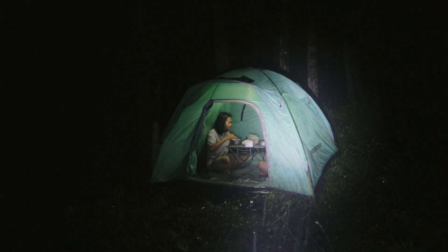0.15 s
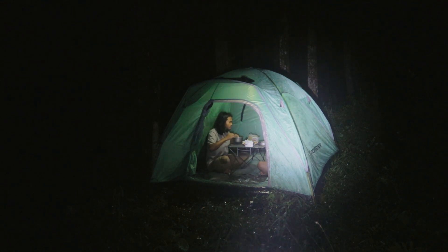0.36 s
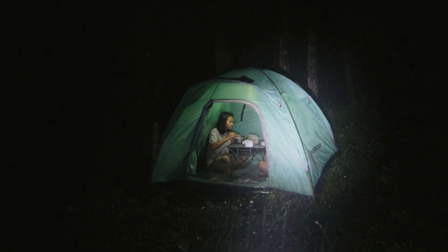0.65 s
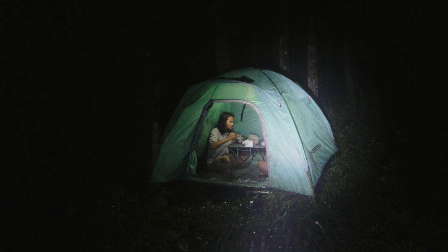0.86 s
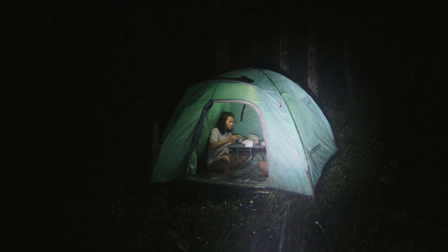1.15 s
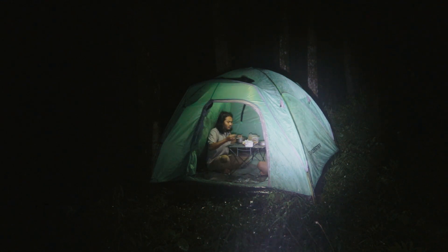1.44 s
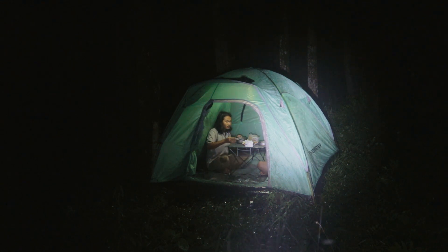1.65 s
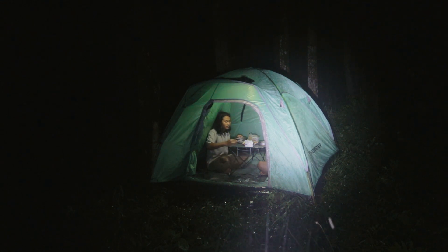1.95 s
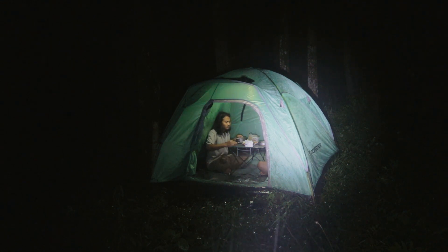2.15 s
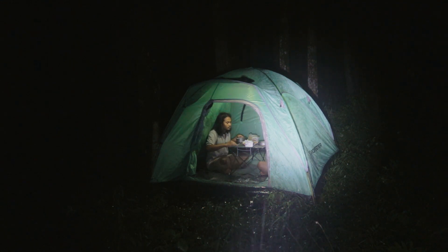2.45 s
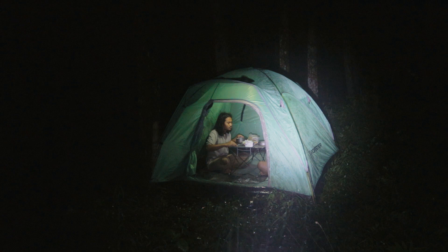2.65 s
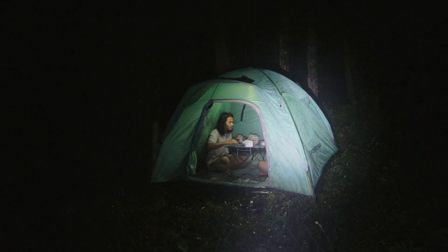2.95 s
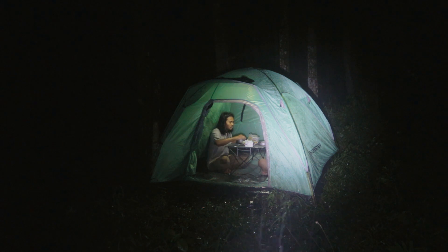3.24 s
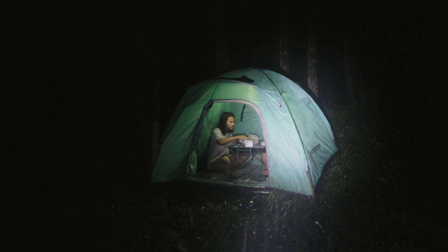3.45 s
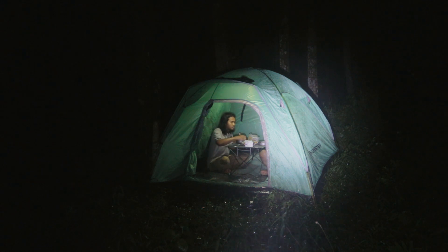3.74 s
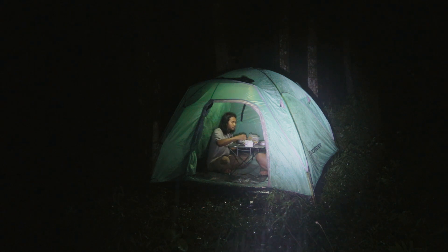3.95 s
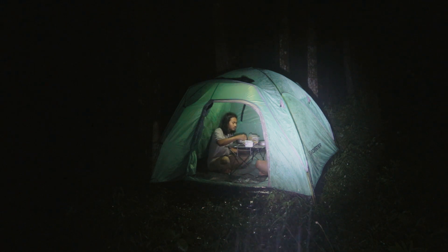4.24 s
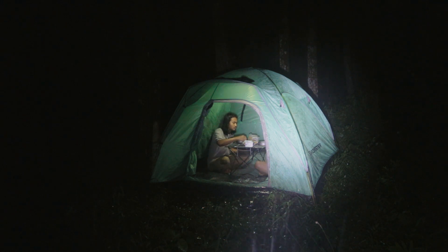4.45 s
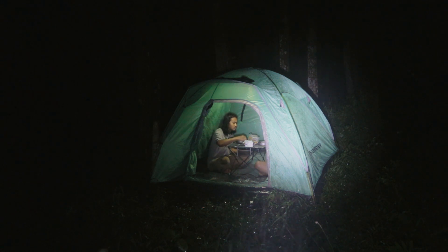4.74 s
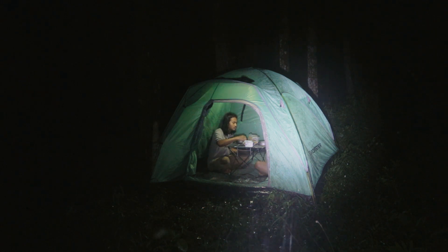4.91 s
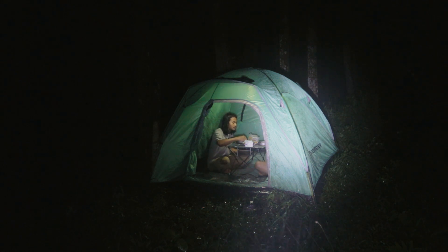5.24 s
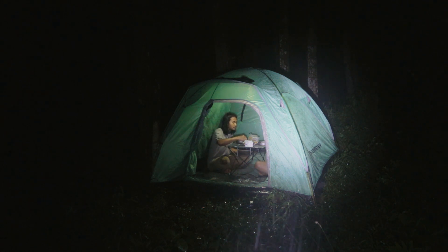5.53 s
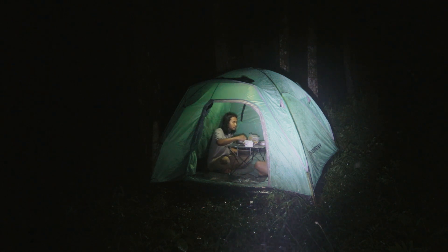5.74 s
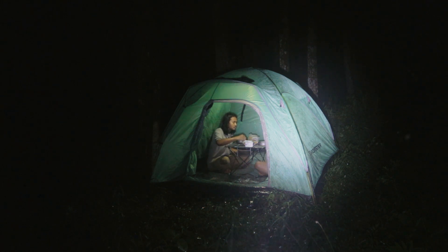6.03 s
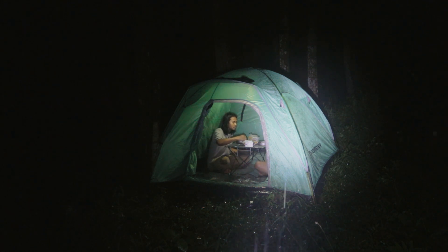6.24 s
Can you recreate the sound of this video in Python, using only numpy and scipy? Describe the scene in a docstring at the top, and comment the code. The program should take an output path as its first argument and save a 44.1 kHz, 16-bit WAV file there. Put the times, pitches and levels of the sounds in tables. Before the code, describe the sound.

Light rain on a tent in a night forest, heard close to the fabric in stereo. Irregular drops hit the taut sheet, each a crisp snap followed by a short sinking thump. Loud hits stand out among many faint ticks, with soft flaps of slack cloth. Behind lie a very quiet rain hiss, leaf patter and a faint steady cricket.

```python
"""Light rain on a tent

Heard from close by the fabric, in a forest at night. A drop excites the taut sheet twice: a sharp snap
of broadband noise through resonances, and a low bending wave that swells later and sinks in pitch.
The further the sheet gives, the stronger its thump and the longer its spatter. Fine drops tick, the slack
sheet flaps, stiff spots ring. Behind them rain hisses in the trees (filtered noise), leaves patter
(random ticks through resonances) and a cricket chirps (a pulsed tone)."""
import sys
import numpy as np
from scipy import signal
from scipy.fft import rfft, irfft, next_fast_len
from scipy.io import wavfile

SR = 44100
rng = np.random.default_rng(int(sys.argv[2]) if len(sys.argv) > 2 else 0)


def digitize_waveform(pressure):
    """Quantize a signal to 16-bit integers and store it at the path in sys.argv[1].

    Rows of a 2-D input are taken as channels; values are limited to [-1, 1].
    """
    field = np.atleast_2d(pressure).T
    bounded = np.clip(field, -1, 1)
    quanta = np.round(bounded * 32767).astype(np.int16)
    wavfile.write(sys.argv[1], SR, quanta)


N = 280917

# voices of an impact: low edge f/Hz, high edge f/Hz, width/centre, trim/dB, ring/spatter length,
# first strike/ripples, tail level/dB, left-right correlation
KNOCK_VOICE = (240.5, 1108, 0.89, 3.5, 3, 1.17, -20, 0.56)
SNAP_VOICE = (887, 4485, 0.7, 1.75, 1.64, 0.68, -28, 0.72)
SPLASH_VOICE = (3999, 12995, 0.86, -4, 1.2, 0.07, -61, 0.84)
SPLASH_HZ = 5280

AGE = np.arange(SR // 6) / SR   # s since an impact
LEVEL_SPAN = SR // 50           # samples: a 0 dB impact has the energy of rms 1 over this span
SHEET_HZ, ARRIVAL_MS = 170, 4.4  # a spot of usual tension: nominal pitch, nominal rise of the thump


def from_db(db):
    """Level: 20 dB is a factor of ten in amplitude."""
    return 10 ** (np.asarray(db) / 20)


def rms_one(x):
    """Normalization: scale to rms 1."""
    return x / np.sqrt(np.mean(x ** 2) + 1e-20)


def unit_hit(x):
    """Energy normalization: scale a short sound to the energy of a 0 dB impact."""
    return rms_one(x) * np.sqrt(LEVEL_SPAN / x.shape[-1])


def at_hz(points, hz):
    """Interpolation of a spectrum on a log-frequency axis."""
    points = np.array(points)
    return np.interp(np.log(hz), np.log(points[:, 0]), points[:, 1])


def band(x, low_hz, high_hz, order=2):
    """Band limitation: a causal Butterworth band-pass."""
    edges = [low_hz, min(high_hz, .48 * SR)]
    sos = signal.butter(order, edges, "band", fs=SR, output="sos")
    return signal.sosfilt(sos, x + 1e-18)


def resonate(x, hz, width_hz):
    """Damped resonance: a pole pair whose radius sets the bandwidth, with a peak gain near 1."""
    r = np.exp(-np.pi * width_hz / SR)
    numerator = np.array([1, 0, -1]) * (1 - r * r) / 2
    denominator = [1, -2 * r * np.cos(2 * np.pi * hz / SR), r * r]
    return signal.lfilter(numerator, denominator, x + 1e-18)


def drift(rate):
    """Slow random modulation: straight lines between normal random knots, rate knots per second."""
    knots = rng.standard_normal(size=512)
    return np.interp(np.arange(N) / SR * rate, np.arange(len(knots)), knots)


def stereo_noise(alike, size):
    """Partial coherence: mid and side noise mixed to a given left-right correlation."""
    mid, side = rng.standard_normal((2, size))
    alike = np.clip(alike, -1, 1)
    opposed = side * [[1], [-1]]
    return (np.sqrt(1 + alike) * mid + np.sqrt(1 - alike) * opposed) / np.sqrt(2)


def turn_phase(x, channel):
    """Interaural phase: one channel lags, little in the bass and by nearly half a turn in the treble."""
    # lag of the channel: f/Hz, phase/rad
    phase_lag = [(120, 0.022), (250, 1.67), (500, 1.88), (1000, 2.06), (2500, 2.66), (6000, 3.02)]
    size = next_fast_len(x.shape[1] + LEVEL_SPAN)
    hz = np.maximum(np.arange(size // 2 + 1) * SR / size, 1)
    turned = rfft(x[channel], size) * np.exp(-1j * at_hz(phase_lag, hz))
    out = x.copy()
    out[channel] = irfft(turned, size)[:x.shape[1]]
    return out


def add(out, sound, s, pan_db=0):
    """Equal-power panning: mix in at a time; positive is left, and the louder channel lags (right if even)."""
    i = int(np.clip(round(s * SR), 0, N - 1))
    gains = rms_one(from_db([[pan_db / 2], [-pan_db / 2]]))
    placed = gains * turn_phase(sound, channel=int(pan_db <= 0))
    out[:, i:i + sound.shape[1]] += placed[:, :N - i]


def forest(patchy_db=1.0, level_db=-56):
    """Filtered noise: far rain in the trees as half-octave bands that flicker a little."""
    # spectrum of the hiss: f/Hz, relative density/dB per Hz
    hiss = [(22, -7), (45, 2), (80, -2.5), (150, -5), (270, -10.5), (600, -11), (1400, -12.5),
            (2800, -16.5), (4300, -21), (6300, -24), (9000, -28.5), (11500, -53), (14500, -77)]
    # left-right correlation of the hiss: f/Hz, correlation (-1..1)
    likeness = [(50, 0.94), (130, 0.94), (400, 0.011), (1500, 0.0051), (3500, 0.042), (7000, 0.84),
                (15000, 0.72)]
    out, edges = 0, 30 * 2 ** (np.arange(19) / 2)
    for low, high in zip(edges, edges[1:]):
        hz = np.sqrt(low * high)
        noise = band(stereo_noise(at_hz(likeness, hz), N), low, high, order=3)
        out = out + from_db(at_hz(hiss, hz) + patchy_db * drift(25)) * noise
    return from_db(level_db) * rms_one(out)


def leaf_patter(level_db=-64.5, per_s=900, spread_db=7.5, width=0.21, count=8):
    """Random impulses through resonances: tiny drops on the leaves tick at one of eight pitches."""
    out = np.zeros((2, N))
    for hz in np.geomspace(900, 6500, count):
        at = np.flatnonzero(rng.random(N) < per_s / count / SR)
        size_db = spread_db * np.minimum(rng.exponential(1, size=2048), 3.5)
        sizes = from_db(size_db) * stereo_noise(0.021, size=2048)
        ticks = np.zeros((2, N))
        ticks[:, at] = sizes[:, at % sizes.shape[1]]
        out += resonate(ticks, hz, width * hz) / hz
    return from_db(level_db) * rms_one(band(out, 540, 6400))


def crickets(hz=5120, level_db=-64, blur_db=-11, waver_db=-0.5, stroke_s=0.017, last_stroke_db=-7,
             echo_db=-15, chorus_hz=4270, chorus_width_hz=620, chorus_db=-69):
    """Amplitude modulation: two firm wing strokes and a weak one pulse a tone; far crickets merge into a band."""
    # some chirp begins at offset_s; chirps repeat about four times a second on both sides of it
    offset_s, period_s, stroke_gap_s = .237, .2553, .049
    age = (np.arange(N) / SR - offset_s + stroke_gap_s) % period_s - stroke_gap_s
    chirp = 0
    for k, db in enumerate((0, 0, last_stroke_db)):
        chirp = chirp + from_db(db) * np.exp(-((age - k * stroke_gap_s) / stroke_s) ** 2)
    phase = 2 * np.pi * np.cumsum(hz + 12 * drift(34)) / SR
    tone = np.sqrt(2) * np.sin(phase) * from_db([[-2.5], [2.5]])   # stronger on the right
    # narrow noise at the same pitch: the chirp blurred by the trees
    blur = rms_one(band(stereo_noise(0, N), hz - 35, hz + 35))
    near = chirp * (tone + from_db(blur_db) * blur) + from_db(echo_db) * blur
    half_width = chorus_width_hz / 2
    chorus = rms_one(band(stereo_noise(0.18, N), chorus_hz - half_width, chorus_hz + half_width))
    return from_db(level_db + waver_db * drift(6.6)) * near + from_db(chorus_db) * chorus


def evened(x, evenness=0.63, keep_s=0.013):
    """Spectral whitening: a slap fills the spectrum evenly, so level the peaks and holes of a short burst."""
    spectrum = rfft(x, 2 * len(AGE))
    power = np.mean(np.abs(spectrum) ** 2, axis=0) + 1e-9
    level = power ** (np.clip(evenness, 0, 1) / 2)
    return unit_hit(irfft(spectrum / level)[:, :len(AGE)] * np.exp(-(AGE / keep_s) ** 2))


def impact(voice, centre_hz, spatter_ms, tail_s=.014):
    """Impulsive excitation of a broad resonance: a strike, decaying ripples and a crackle of thrown droplets."""
    low_hz, high_hz, width, trim_db, ring, strike, tail_db, alike = voice
    ripple_s = ring * spatter_ms / 1000
    ripples = unit_hit(stereo_noise(alike, len(AGE)) * np.exp(-AGE / ripple_s))
    droplets = rng.random(len(AGE)) < 900 / SR   # 900 a second on average
    tail = unit_hit(stereo_noise(alike, len(AGE)) * droplets * np.exp(-AGE / tail_s))
    first_strike = unit_hit(1. * (AGE == 0))
    push = evened(ripples - strike * first_strike) + from_db(tail_db) * tail
    ringing = resonate(push, centre_hz, width * centre_hz)
    return from_db(trim_db) * unit_hit(band(ringing, low_hz, high_hz, order=3))


def thump(hz, arrival_ms, cycles=0.55, sag=0.22, overtone=2.12, overtone_db=-9,
          rustle_db=-14, rustle_s=0.021):
    """Bending wave: it swells after the snap, dies fast and sinks in pitch; its upper partial dies sooner."""
    rise = np.clip(arrival_ms, 2, 4.6) / 1000
    growth = 1 - np.exp(-(AGE / rise) ** 2 * 2)
    swell = growth * np.exp(-np.maximum(AGE - rise, 0) * hz / cycles)
    sinking_hz = hz * (1 - sag + 2 * sag * np.exp(-AGE / rise * 1.5))
    phase = 2 * np.pi * np.cumsum(sinking_hz) / SR
    swing = unit_hit(swell * np.sin(phase))
    upper = unit_hit(swell * np.exp(-AGE * hz) * np.sin(overtone * phase))
    folds = unit_hit(band(stereo_noise(0.69, len(AGE)) * np.exp(-AGE / rustle_s), 100, 290))
    return unit_hit(swing + from_db(overtone_db) * upper + from_db(rustle_db) * folds)


def rattle(low_hz=190, high_hz=430, decay_s=0.0078, alike=0.52):
    """Damped band noise: the fabric shudders briefly, in pitch between the thump and the knock."""
    burst = evened(stereo_noise(alike, len(AGE)) * np.exp(-AGE / decay_s), keep_s=0.054)
    return unit_hit(band(burst, low_hz, high_hz))


def flutter(low_hz=170, high_hz=600, folds_per_s=300, alike=0.52, decay_s=.027):
    """Random impulses under a decay: the folds of the sheet go on flicking raggedly."""
    flicks = rng.random(len(AGE)) < folds_per_s / SR
    burst = stereo_noise(alike, len(AGE)) * flicks * np.exp(-AGE / decay_s)
    return unit_hit(band(burst, low_hz, high_hz))


def drops(thump_trim_db=-4.5, splash_trim_db=2.0, rattle_db=-7.0, rattle_per_give=0.54,
          rattle_per_octave_db=6):
    """Membrane response: each spot answers with its own mix of thump, rattle, knock, snap and splash."""
    # drops from the branches: t/s, level before the voice trims/dB, give = thump over level before trim/dB,
    # nominal sheet f/Hz, knock over level before trim/dB, knock f/Hz, snap f/Hz,
    # wetness = splash over level before trims/dB, left over right/dB
    drop_list = [(0.0146, -28.5, 8, 170, 2.5, 387, 1020, -12.5, 3.5),
                 (0.089, -48, 8, 153, 1, 530, 1060, -6.5, -2.5),
                 (0.121, -69, -10, 170, -8, 440, 2400, -1, -0.5),
                 (0.183, -59.5, -16, 170.0, -12, 440.0, 1950.0, -2, -8),
                 (0.356, -59.5, -12, 170.0, 2, 440.0, 1270, -10.0, -10),
                 (0.373, -63, -4.0, 170.0, 0, 440.0, 1580, -4, 2),
                 (0.402, -44.5, -20, 161, 0, 304, 1520, -7, -1.5),
                 (0.4105, -45, 15.5, 186, 2, 483, 1180, -6, 4),
                 (0.51, -59, -1, 170.0, -4, 440.0, 1740.0, -4, 0),
                 (0.588, -58, -19, 170.0, -22, 440.0, 2110, -2, -20),
                 (0.695, -62, -14, 170, -6, 440, 1500, -11, -0.5),
                 (0.7243, -60.5, -18, 150.0, -6, 759.0, 2210.0, 6.5, -9),
                 (0.803, -57, -17, 170.0, -24, 440.0, 2860, -8, -9),
                 (0.918, -67, -2, 170.0, 9, 440.0, 1560.0, -17, -4),
                 (0.958, -54, 15, 170, -1, 442.0, 1470.0, -3, 0.5),
                 (0.974, -32.5, 2.5, 196, 0, 310, 1200, -15, 4),
                 (1.0144, -55, 2, 128.0, -5.0, 546.0, 2280.0, 3.5, -1),
                 (1.037, -61, 0, 170, -5, 440, 2400, 3, 0),
                 (1.056, -58.5, -11, 170.0, -6, 440.0, 1660, -7, -13),
                 (1.105, -56.5, 17, 114, 5, 439.0, 1390.0, -3, -3),
                 (1.133, -31, -16, 160, -9.5, 540, 1000, -16, -4.5),
                 (1.202, -61, -8, 170, -6, 440, 1900, 2, 0),
                 (1.229, -61, 0, 170.0, -5.0, 440.0, 2310.0, -1, 3),
                 (1.272, -50.5, 13.5, 168, 2.5, 426.0, 1270.0, -4, -5),
                 (1.303, -38.5, -1, 202.0, 2, 326.0, 1750, -8, 1),
                 (1.311, -36, 8, 152, -8, 372, 1740, -12, 3.5),
                 (1.36, -60.5, -11, 170.0, -19, 440.0, 2320.0, -2, 3),
                 (1.471, -41.5, -9, 192, -5, 313, 1400, -6, -6.5),
                 (1.598, -46.5, -2.5, 143, -15, 466.0, 1380, -11.5, 0),
                 (1.625, -54.5, -5, 170, -15, 440, 1400, -19, -1),
                 (1.77, -63, -8, 170, -6, 440, 1900, -7, -3), (1.809, -59, 1, 170.0, 1, 437, 1450, -6, -9),
                 (1.8301, -58.5, 8, 140, 2, 580.0, 2100.0, 6.5, -0.5),
                 (1.897, -56, -6, 170.0, -1.5, 440.0, 1970.0, -19, -5),
                 (2.01, -34.0, 14, 145, 0, 480, 1150, -11, 3),
                 (2.037, -62, -5, 170.0, 2, 440.0, 1920.0, -2.0, -6),
                 (2.0513, -60.5, -7, 126, 4, 504.0, 1110, -2, 17.0),
                 (2.115, -58, -1, 125.0, -4, 661.0, 2940.0, 4, -16),
                 (2.1307, -34.5, -3, 210, -13, 483, 1310.0, -9, -6),
                 (2.146, -41, 3.5, 204, 6, 325, 1050.0, -11.5, -5),
                 (2.171, -60, -5, 170.0, -3, 440.0, 1830.0, -5.0, -1),
                 (2.19, -55, 12, 135, 5, 372.0, 2450.0, 2.5, 9),
                 (2.199, -45.5, 8, 150, -3, 386.0, 1500, -3.5, -3),
                 (2.2373, -34, -8, 164, -9.5, 338.0, 1880, -8, -4),
                 (2.3155, -27, 7.5, 210, 2.5, 500, 1230, -8, -3),
                 (2.4064, -40.5, -19, 242.0, -3, 406, 1110, -16, 3.5),
                 (2.4227, -46, 4.5, 128, -1, 440, 2000, -16, 1.5),
                 (2.4809, -45, -33.0, 161.0, -15, 609.0, 2500, -7.5, 7),
                 (2.524, -57, -15, 170.0, -22, 440.0, 2050.0, -7, -13),
                 (2.547, -49.5, -2.5, 183, -5, 530, 1260, -0.5, -4),
                 (2.693, -60, 0.0, 170.0, 5, 440, 1320, -24, -4),
                 (2.721, -57.5, 2, 189, -1, 564.0, 1810.0, 4.5, -2.5),
                 (2.779, -64, 7, 129, 0, 440, 2400, 4, -0.5),
                 (2.796, -55.0, -7, 170.0, -15, 440.0, 1710, -7, -8),
                 (2.8826, -52.5, 1, 214, -1.5, 401.0, 1830.0, 0, 3.5),
                 (2.904, -57, -15, 170.0, 2, 440.0, 1710.0, -5, 2),
                 (2.9256, -40.5, 2.5, 182, -2, 373, 1010, -8, 1),
                 (2.961, -65, 16, 170.0, 4, 440.0, 2680, 11, -8),
                 (3.0659, -52.5, 1, 108, -10, 792.0, 970, -6.5, 3),
                 (3.165, -60.5, -16, 170.0, 0, 445, 1440.0, -12, 0),
                 (3.176, -58, -12, 108.0, -0.5, 524, 2110, -2.5, -10),
                 (3.247, -60.5, -14, 170, -3, 440, 2000, 4.5, -0.5),
                 (3.283, -61.5, -14, 170.0, -1, 440.0, 1630.0, -4.0, -19),
                 (3.324, -36.5, -22, 215.0, -17.5, 298, 1750, -20, -5),
                 (3.4214, -37, -12, 223.0, -9, 344, 1340, -12, 5),
                 (3.498, -58, 2, 170.0, -9, 440.0, 2520, -1.5, -10),
                 (3.523, -59, -6, 170, -7, 440, 1600, -7, -0.5),
                 (3.701, -43.5, -18, 158, -11.5, 496.0, 1080, -16.5, -7),
                 (3.745, -56, -8, 170, -6, 440, 1500, -17, 0),
                 (3.7764, -48.5, 15.5, 180, 8, 458, 1650, 0.5, 0),
                 (3.813, -62, 2, 170.0, 3, 440.0, 1550.0, -24, 3),
                 (3.8217, -48, -8, 170.0, -4, 440.0, 1550, -1, 5),
                 (3.8283, -39.5, 15.5, 155, 1, 397, 1430, -1.5, -1),
                 (3.88, -61, 12, 170.0, 4.5, 440.0, 1620.0, -6.5, -6),
                 (3.924, -57, -3, 170.0, -15, 445, 2060.0, -9, -1.5),
                 (3.992, -55.5, -10, 170.0, -0.5, 440.0, 1250, -11, -13),
                 (4.005, -68, -10, 170, -3, 440, 1700, -9, 3),
                 (4.0235, -37, -10, 216.0, -1, 483, 1370, -6, -7.5),
                 (4.115, -54, -13, 170.0, -12, 440.0, 1970, -4.5, -13),
                 (4.164, -60, -2, 170.0, -3, 440.0, 1900, 2.5, -11),
                 (4.268, -57, -14, 170.0, -1, 440.0, 1740.0, -16, -8),
                 (4.286, -57, -8, 170.0, 3.5, 446, 1200, -14, -4),
                 (4.337, -54.5, 12.5, 184, 0, 442.0, 1890.0, 3.5, -6.5),
                 (4.37, -39.5, -3.5, 215, -3, 440, 1390, -6.5, -1),
                 (4.3962, -45, -3, 135.0, -5.5, 560, 930, -10, -5),
                 (4.5666, -33.5, -2, 240, 1, 334, 1340, -5, -5.5),
                 (4.601, -44.5, 3, 184.0, 4, 423, 880, -21, 1.5),
                 (4.622, -64, 3, 170.0, -8, 440.0, 3370.0, 7, -12),
                 (4.658, -40.5, 8, 170.0, -1.0, 376, 1800, -6, 5.5),
                 (4.6766, -39.5, 5, 178, 0, 457, 1120, -5.5, 0),
                 (4.766, -71, -12, 170, -6, 440, 1900, -3, -0.5),
                 (4.846, -52, -29, 170.0, -17, 442, 1900, -10.0, -4),
                 (4.902, -58, -9, 170.0, -3.5, 440.0, 1280, -1, -3),
                 (4.946, -57, -3, 170.0, -5, 440.0, 1540, -10, -7),
                 (4.968, -67.5, 7, 149, -17, 440, 2800, 11.5, -0.5),
                 (5.02, -60, 2, 170.0, -8, 440.0, 2220.0, -8, -13),
                 (5.053, -57.5, -10, 170.0, -9, 440.0, 1920.0, -12, 11),
                 (5.103, -59, -5, 170, -2, 440, 1700, 0, -0.5),
                 (5.188, -59, -18, 170.0, -10, 440.0, 1670.0, 0, -1.5),
                 (5.2078, -36, -13, 193, -4.5, 376, 1500, -8, 3),
                 (5.223, -34.5, 2.5, 178, 0.5, 333, 1280, -6, -3.5),
                 (5.276, -60, 10, 170.0, -2, 440.0, 1770.0, -8, -4),
                 (5.383, -63.5, 13, 151, -3, 440, 2200, 1.5, -0.5),
                 (5.434, -59.5, 15, 107, -18, 340.0, 3600.0, 3.5, 1),
                 (5.5769, -60, 2, 202, 11.5, 423, 1130.0, -2, -4.5),
                 (5.642, -58.5, -2, 170.0, 0.5, 440.0, 1620, 5, -0.5),
                 (5.7612, -27.5, -10, 213, -4, 480, 1390, -11, 0),
                 (5.8537, -53, -3, 192, 0, 375.0, 1280.0, -5.5, -7),
                 (5.88, -64, 11, 170.0, -3, 440.0, 2080.0, 6, -3),
                 (5.914, -53, -10, 170.0, -12, 440.0, 1250, -14.0, 0.5),
                 (5.9434, -45, 9.5, 170.0, 3, 346, 1350, 0, -6),
                 (5.9594, -43.5, 4.5, 204, 6, 356, 850.0, -12, 4.5),
                 (6.0467, -37, 9.5, 158, 7, 473, 1030, -8, -7.5),
                 (6.0944, -58.5, 1, 146.0, -3, 434.0, 2330.0, 7, -4),
                 (6.161, -25, 0.5, 144, -0.5, 600, 1830, -2, 3),
                 (6.206, -42, 6, 179.0, 0, 663.0, 1280, -10, 3)]
    spatter_usual_ms = 1.92
    arrival_per_db, spatter_per_db = 0.12, 0.13   # octaves of time per dB of give
    # flutter of a usual knock, and dB of flutter per dB of knock
    usual_knock_db, usual_flutter_db, flutter_growth = -39, -46.5, 0.46
    out = np.zeros((2, N))
    for s, db, give_db, sheet_hz, knock_db, knock_hz, snap_hz, wetness_db, pan_db in drop_list:
        tautness = np.log2(sheet_hz / SHEET_HZ)   # octaves; a tauter spot answers sooner
        arrival_ms = ARRIVAL_MS * 2 ** (arrival_per_db * give_db - tautness)
        spatter_ms = np.clip(spatter_usual_ms * 2 ** (spatter_per_db * give_db - tautness), .6, 4.5)
        shudder_db = rattle_db + rattle_per_give * give_db + rattle_per_octave_db * tautness
        sound = from_db(give_db + thump_trim_db) * thump(sheet_hz, arrival_ms)
        sound += from_db(shudder_db) * rattle()
        sound += from_db(knock_db) * impact(KNOCK_VOICE, knock_hz, spatter_ms)
        sound += impact(SNAP_VOICE, snap_hz, spatter_ms)
        sound += from_db(wetness_db + splash_trim_db) * impact(SPLASH_VOICE, SPLASH_HZ, spatter_ms)
        flutter_db = usual_flutter_db + flutter_growth * (db + knock_db - usual_knock_db)
        add(out, from_db(db) * sound + from_db(flutter_db) * flutter(), s, pan_db)
    return out


def flaps(sag=0.17, rustle_db=0):
    """Slack membrane: loose fabric swings slowly, sinking in pitch, with a rustle; harder flaps are shorter."""
    # flaps: t/s, level/dB, nominal f/Hz
    flap_list = [(.017, -27.5, 64.5), (0.612, -48.5, 90), (.996, -38, 68.5), (1.833, -46, 64),
                 (2.013, -31, 54), (2.192, -30.5, 51), (2.718, -46, 53.4), (3.176, -45, 46.2),
                 (3.833, -32.5, 57), (4.377, -41.5, 76), (4.973, -46.5, 97), (5.383, -33.5, 58),
                 (6.052, -36, 60)]
    usual_db, usual_s, octaves_per_db = -39, 0.038, 0.066
    fade = np.minimum(8 * (1 - AGE / AGE[-1]), 1)
    out = np.zeros((2, N))
    for s, db, hz in flap_list:
        length = usual_s * 2 ** (octaves_per_db * (usual_db - db))
        swell = AGE / length * np.exp(-AGE / length * 2.37)
        sinking_hz = hz * (1 - sag + 2 * sag * np.exp(-AGE / length))
        swing = unit_hit(swell * np.sin(2 * np.pi * np.cumsum(sinking_hz) / SR))
        folds = unit_hit(band(stereo_noise(0.83, len(AGE)) * swell, hz / 2.5, hz * 1.85))
        flap = unit_hit((swing + from_db(rustle_db) * folds) * fade)
        add(out, from_db(db) * flap, s)
    return out


def fine_drops(level_db=-68, spread_db=2, knock_db=0, splash_db=-4, colour_db=-2.0, pan_db=3,
               thump_db=-1, count=100):
    """Random superposition: small drops tick and drum softly at random times and directions."""
    out = np.zeros((2, N))
    times = rng.random(count)
    traits = np.clip(rng.standard_normal((count, 5)), -1.5, 1.5)
    for when, (size, low, high, pitch, pan) in zip(times, traits):
        sound = impact(SNAP_VOICE, 1800 * 2 ** (.4 * pitch), 3.4)
        sound += from_db(knock_db + colour_db * low) * impact(KNOCK_VOICE, 430, 5.0)
        sound += from_db(splash_db + colour_db * high) * impact(SPLASH_VOICE, SPLASH_HZ, 10)
        sound += from_db(thump_db + colour_db * low) * thump(SHEET_HZ * 2 ** (.3 * pitch), ARRIVAL_MS)
        add(out, from_db(level_db + spread_db * size) * sound, when * N / SR, pan_db * pan)
    return out


def pings(cycles=1.4, rise_cycles=0.36):
    """Heavily damped mode: stiff fabric by a seam or pole rings briefly, damped at once by the wet cloth."""
    # rings of stiff spots: t/s, level/dB, f/Hz, left over right/dB
    ping_list = [(1.1338, -35.5, 1320, -3), (1.304, -41, 235, -2), (1.4727, -50, 387, -8),
                 (2.1308, -39, 1700, -10), (2.2376, -43.5, 6700, -9), (2.3162, -22, 268, 0),
                 (2.407, -42, 2870, 11), (3.3244, -43.5, 1550, -1), (3.4217, -37, 1500, 6),
                 (3.691, -44, 3300, -15), (3.7015, -49, 3580, 5), (4.5665, -35, 385, -3),
                 (4.6576, -52, 1650, 5), (4.6772, -52, 840, -1), (5.7618, -25, 580, 0),
                 (5.9592, -44, 950, 9), (6.1619, -21, 587, -3.5)]
    out = np.zeros((2, N))
    for s, db, hz, pan_db in ping_list:
        turns = AGE * hz
        envelope = (1 - np.exp(-turns / rise_cycles)) * np.exp(-turns / cycles)
        ring = unit_hit(np.sin(2 * np.pi * turns) * envelope)
        add(out, from_db(db) * np.array([ring, ring]), s, pan_db)
    return out


def scene():
    """Modal resonance: all that strikes the sheet, and the far rain too, makes the tent boom faintly."""
    # air and poles of the tent: f/Hz, decay by 60 dB t/s, level/dB
    tent_modes = [(84.6, 0.14, -9.5), (112.5, 0.41, -4), (153.2, 0.11, -2), (242.3, 0.4, -10.5)]
    sound = drops() + pings() + fine_drops() + flaps() + turn_phase(forest(), channel=1)
    boom = 0
    for hz, t60, db in tent_modes:
        width_hz = np.log(1000) / np.pi / t60
        boom = boom + from_db(db) * resonate(sound, hz, width_hz)
    return sound + boom + leaf_patter() + turn_phase(crickets(), channel=1)


def record(dry, low_cut_hz=27, stop_hz=17200):
    """Band limitation and clipping: rumble is cut, peaks clip at full scale, then the top is cut."""
    high_pass = signal.butter(4, low_cut_hz, "high", fs=SR, output="sos")
    low_pass = signal.cheby2(16, 60, stop_hz, fs=SR, output="sos")   # 60 dB down from stop_hz up
    clean = signal.sosfilt(high_pass, dry)
    return signal.sosfilt(low_pass, np.clip(clean, -1, 1))


dry = scene()
out = record(dry)
digitize_waveform(out)
```